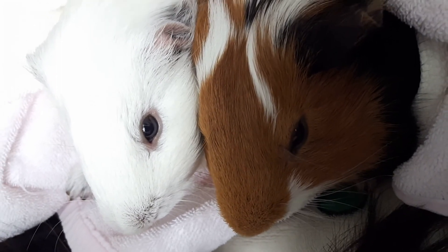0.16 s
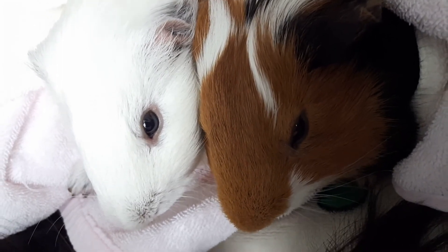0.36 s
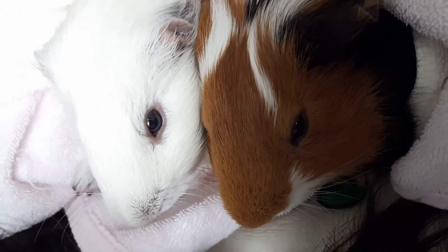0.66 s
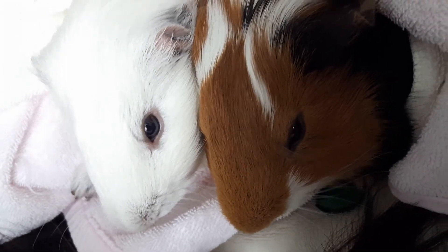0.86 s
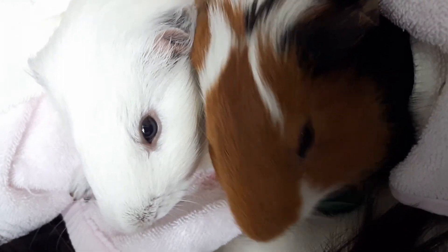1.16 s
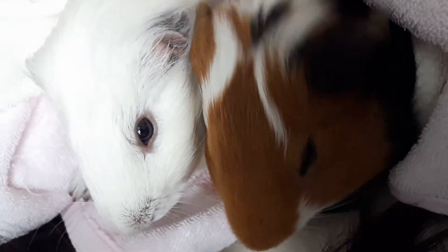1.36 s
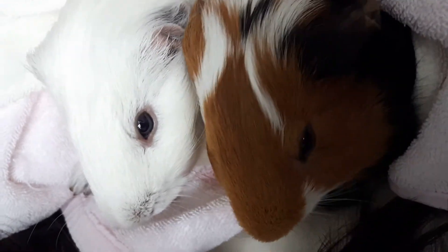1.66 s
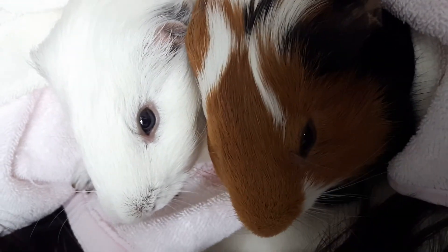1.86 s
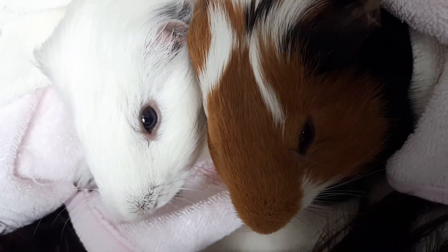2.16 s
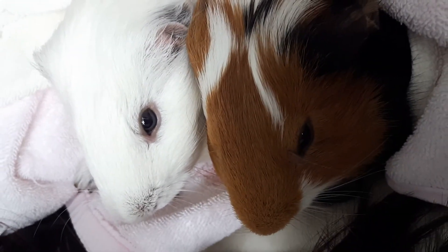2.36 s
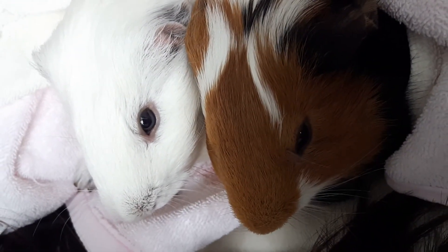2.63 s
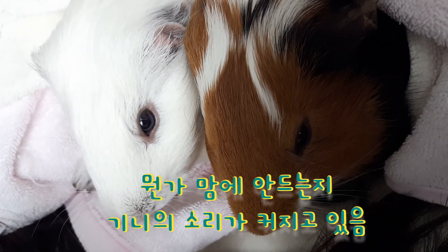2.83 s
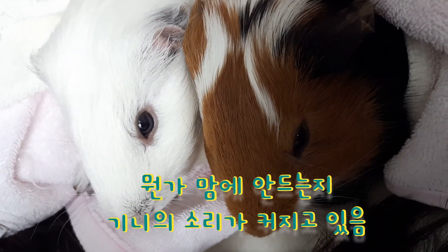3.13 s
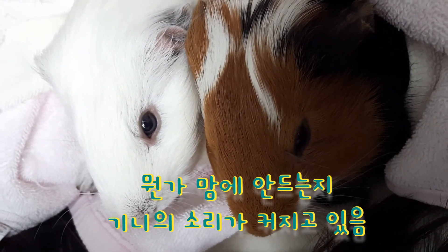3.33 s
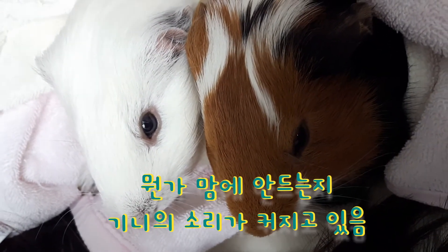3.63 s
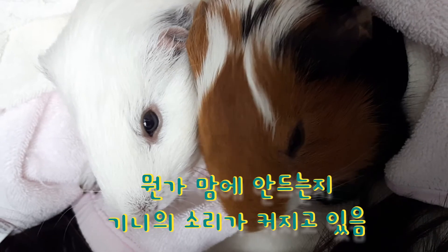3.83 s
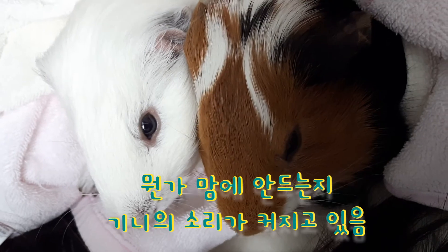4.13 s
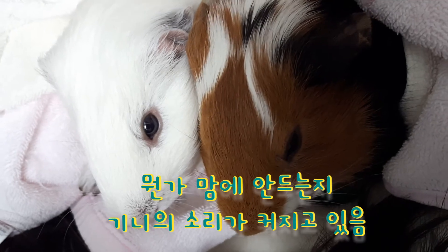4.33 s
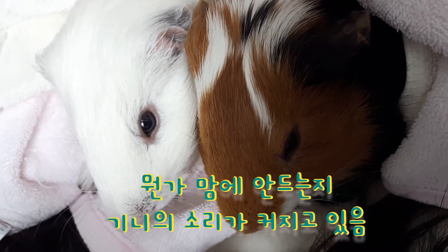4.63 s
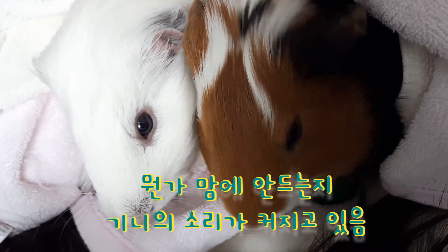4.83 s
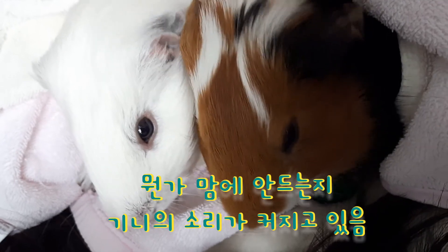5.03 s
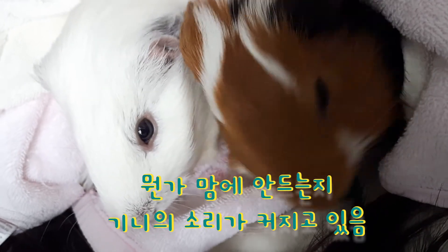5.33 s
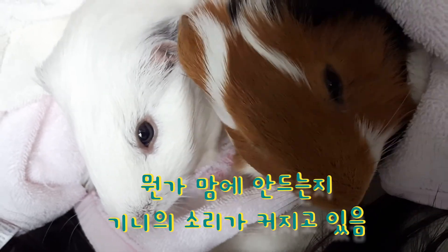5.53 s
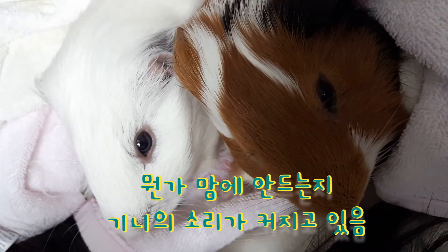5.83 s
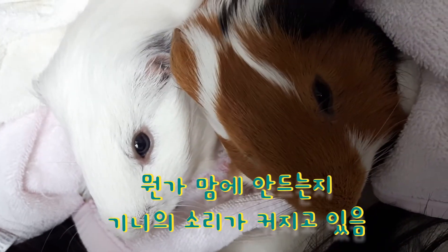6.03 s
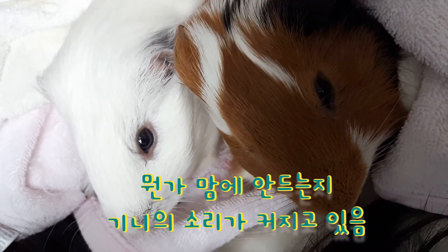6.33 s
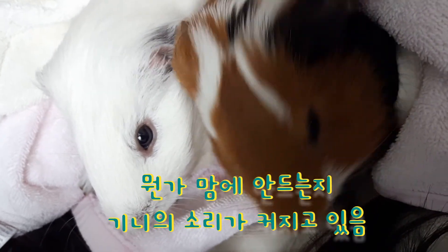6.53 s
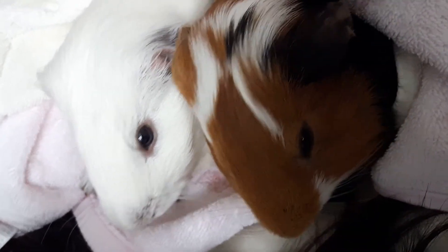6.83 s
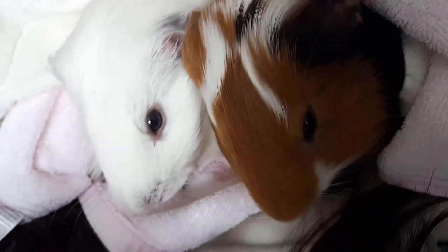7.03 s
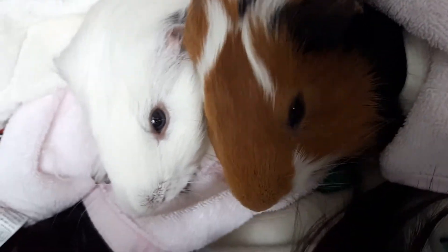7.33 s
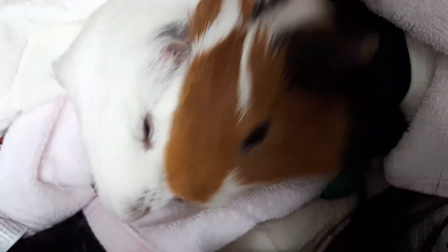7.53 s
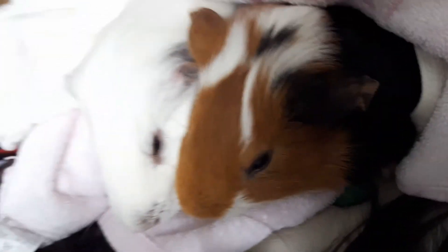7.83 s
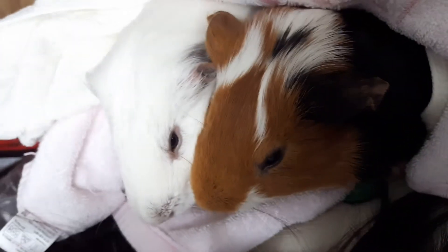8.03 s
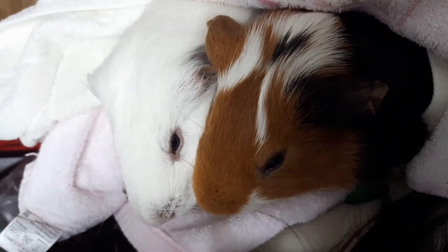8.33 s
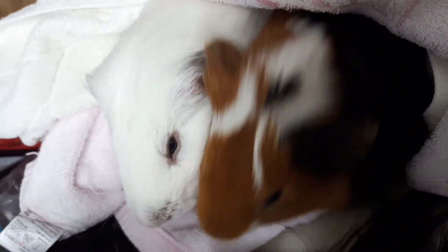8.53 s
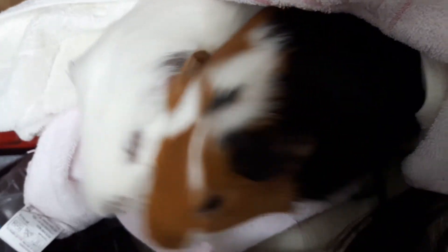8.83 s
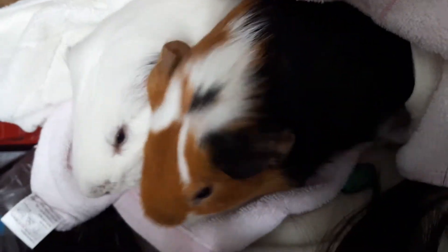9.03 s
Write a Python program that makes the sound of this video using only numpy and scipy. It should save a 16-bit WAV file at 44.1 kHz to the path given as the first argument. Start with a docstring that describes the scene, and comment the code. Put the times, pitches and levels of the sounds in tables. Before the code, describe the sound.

A quiet furnished room with soft low hum, light hiss and a barely perceptible high whistle; a guinea pig is very close in stereo. At 0.25-0.6 s it gives a rough, cracking whine that drops low, then raspy grunts and small peeps at 0.85-1.15. Dry creaky clicks come at 1.4-1.5, a tiny falling peep at 1.7. Smoother wavering moans follow at 2.1-2.4 and 2.7-3.0. From 3.2 to 4.0 short whines fall sharply between rasps and a peep. A brief snort with a soft knock lands at 4.17, then a low whimper and a longer descending whine at 4.55-4.9, another at 5.1-5.4. Faint knocks at 5.7 and 6.2 lead to whines at 6.5-6.75 and a stronger one at 7.0-7.3. After a pause, a short raspy squeak at 8.4; small padded ticks and faint fur rustling at 8.6-9.1 close it.

```python
"""Guinea pig complaining on a blanket

A guinea pig close by gives short gliding whines that break into rasps, creaks and peeps: pulsing vocal
folds make the whines and rasps, a sliding tone each peep, ringing snaps the creaks, all with air noise.
It snorts once in swelling noise; as it moves, small ticks knock and fur rustles near the end.
The quiet room hums and adds a faint tail; two microphones hear the voice with different colours."""
import sys
import numpy as np
from scipy import signal
from scipy.fft import rfft, irfft, next_fast_len
from scipy.io import wavfile
from scipy.ndimage import uniform_filter1d, map_coordinates

SR = 44100
rng = np.random.default_rng(int(sys.argv[2]) if len(sys.argv) > 2 else 0)


def persist_wave(psi):
    """Save psi, clipped to +-1, as 16-bit WAV."""
    counts = np.round(np.clip(psi, -1, 1) * 32767).astype(np.int16)
    wavfile.write(sys.argv[1], SR, np.atleast_2d(counts).T)


N = 404397  # length in samples
TOP_HZ = 15700  # nothing above this is kept
PEEP_ARCH = 0.034  # share by which a peep's pitch bulges in the middle

# Low room noise. Each row: frequency in Hz, relative density in dB per Hz.
ROOM_SPECTRUM = [(20, -3), (36, -5.5), (49, -5.5), (66, -4), (150, -8), (215, -1.5), (350, -8),
                 (430, -14.5), (800, -19), (1500, -26), (3000, -57)]
# How alike the room noise is at left and right. Each row: frequency in Hz, likeness (1 = the same).
ROOM_LIKENESS = [(60, 0.95), (130, 0.76), (290, 0.89), (640, 0.017), (3000, 0.43)]
# Steady hum of an appliance. Each row: frequency in Hz, level in dB before the left-right lean, width in Hz.
HUM_BANDS = [(81.4, -71, 7), (125.1, -71, 12), (285, -61, 26)]
# A faint high whistle. Each row: frequency in Hz, level in dB before the left-right lean, width in Hz.
WHISTLE_BANDS = [(12635, -93.5, 110)]
# Microphone hiss. Each row: frequency in Hz, relative density in dB per Hz.
HISS_SPECTRUM = [(700, -25.5), (1500, 6), (2200, 5.5), (3500, 2), (5500, -1.5), (7300, -4), (8500, -8.5),
                 (10500, -10), (12500, -3.5), (15500, -4.5)]
# What throat and mouth make of the overtones. Each row: frequency in Hz, relative gain in dB.
THROAT_RESPONSE = [(200, -14.5), (450, -5), (620, 1), (730, -4.5), (860, 3.5), (1100, 2), (1350, -7),
                   (1650, -18), (1950, -22.5), (2300, -10), (3200, -32), (4200, -37), (6000, -56)]
# Places where the voice breaks into a rasp. Each row: start in seconds, length in seconds, pitch in Hz,
# fundamental in dB and overtones in dB (both at mid-length), swell from start to end in dB, roughness 0-1.
RASPS = [(0.243, 0.014, 295, -47, -53, -2, 0.4), (0.311, 0.027, 273, -49.5, -51, -5, 0.9),
         (0.336, 0.072, 293, -54, -48, -1, 0.88), (0.854, 0.023, 288, -52.5, -56, 0, 0.37),
         (0.905, 0.033, 302.5, -58, -48, 1, 0.9), (0.94, 0.05, 297, -51.5, -48.5, -6, 0.86),
         (0.978, 0.11, 164.8, -64, -50.5, 0.5, 0.88), (1.076, 0.074, 191.6, -60, -47, 7, 0.58),
         (3.204, 0.024, 277, -42.5, -50, -4, 0.48), (3.224, 0.043, 265, -54, -48, -10, 0.6),
         (3.261, 0.031, 293, -48, -48.5, 10, .7), (3.678, 0.016, 303, -47, -51, 4, 0.6),
         (3.696, 0.036, 282, -51, -49, -3, 0.54), (3.795, 0.057, 233.7, -52, -49.5, 0.5, 0.76),
         (3.847, 0.043, 263, -53, -45.5, 0, 0.78), (3.88, 0.047, 288.4, -45.5, -42.5, 1, 0.33),
         (4.697, 0.027, 257, -52.5, -46.5, 6, 0.4), (4.841, 0.022, 277, -37, -51, 0, 0.41),
         (5.144, 0.036, 356, -57.5, -53, -2, 0.5), (5.249, 0.05, 258, -45.5, -49.5, -3, .33),
         (6.503, 0.026, 272, -50, -54, -2, 0.83), (6.594, 0.019, 334, -51, -50.5, -5, 0.78),
         (7.024, 0.047, 319, -65, -50, 8, 0.65), (7.108, 0.031, 302, -44.5, -43, -3, 0.54),
         (8.374, 0.012, 323, -46.5, -62, 0, .4), (8.396, 0.047, 296, -54, -50.5, -3, 0.72)]
# Gliding whines. Each row: extra brightness in dB, roughness 0-1 (before pitch scales it), and a course
# of points, each with time in seconds, pitch in Hz, level in dB before the whine's common gain.
WHINES = [ (0, 0.34, [(0.245, 307, -45.5), (0.267, 497.3, -50), (0.295, 377, -47), (0.311, 545.0, -43.5),
          (0.325, 472.4, -48)]), (-0.5, 0.22, [(0.392, 759, -44), (0.43, 512, -44), (0.448, 672, -44),
          (0.464, 534, -44), (0.482, 380.5, -41), (0.51, 276, -35.5), (0.56, 255.5, -48.5),
          (0.592, 282, -37.5), (0.608, 266, -44)]), (0, 0.26, [(0.881, 563, -40), (0.889, 553, -46),
          (0.907, 470, -43)]), (-3.5, .1, [(2.11, 304, -47), (2.148, 314.7, -45.5), (2.184, 383.6, -50),
          (2.222, 547, -46), (2.252, 364, -43), (2.278, 309, -40), (2.3, 289.9, -37), (2.344, 348.7, -42),
          (2.37, 334.6, -42.5), (2.406, 284.7, -35.5), (2.43, 292.9, -51.5)]),
          (-3, 0.23, [(2.695, 300, -62), (2.705, 322, -51.5), (2.729, 350, -49), (2.755, 523.6, -48),
          (2.787, 469, -49), (2.817, 324, -43.5), (2.859, 295.3, -39), (2.895, 295, -38),
          (2.921, 334.7, -39.5), (2.971, 367.4, -39.5), (2.99, 304, -43)]), (-2.5, 0.2, [(3.288, 681, -45),
          (3.31, 701, -42), (3.35, 445, -43), (3.364, 424, -42.5), (3.388, 271, -37.5), (3.408, 282, -39)]),
          (-2, .15, [(3.905, 662, -42), (3.919, 643, -36.5), (3.933, 599, -41.5), (3.965, 275, -41.5)]),
          (0, 0.46, [(4.153, 294, -44), (4.189, 355, -49), (4.21, 313.2, -44)]),
          (-2.5, 0.071, [(4.255, 327, -45.5), (4.275, 344.7, -46.5), (4.305, 311.4, -43), (4.335, 333, -44),
          (4.363, 319, -44), (4.379, 280, -61)]), (-4.5, 0.57, [(4.555, 412, -53), (4.575, 513, -53),
          (4.603, 625, -45.5)]), (-1.5, 0.16, [(4.619, 625.6, -48.5), (4.673, 577, -46.5),
          (4.687, 637, -43.5), (4.715, 425.4, -40.5), (4.739, 467.4, -43), (4.763, 404, -41),
          (4.787, 432, -40.5), (4.839, 294.8, -35.5), (4.886, 308, -41)]),
          (-11.5, 0.25, [(5.11, 557, -54.5), (5.128, 665, -55), (5.18, 642, -48), (5.198, 550, -53),
          (5.255, 536, -46.5)]), (-2.5, 0.22, [(5.28, 301.6, -35.5), (5.318, 296, -34.5),
          (5.376, 307.5, -44), (5.398, 287, -46)]), (-4, 0.2, [(6.518, 437.4, -51.5), (6.548, 450.4, -55.5),
          (6.568, 607.5, -48), (6.588, 462.1, -51), (6.614, 599, -48), (6.646, 456, -46),
          (6.676, 300, -38.5), (6.69, 257.1, -36), (6.706, 276, -51), (6.732, 284.5, -37.5),
          (6.755, 294, -53)]), (0, 0.18, [(7.06, 424.6, -40), (7.072, 443.5, -45.5), (7.11, 430.7, -43),
          (7.136, 604, -42.5), (7.15, 531, -41.5), (7.182, 442.3, -40), (7.21, 449, -41), (7.24, 414, -40),
          (7.264, 329.4, -34.5), (7.28, 265, -33), (7.3, 292.9, -42.5)]), (1.5, 0.33, [(8.434, 492, -44),
          (8.454, 409, -45), (8.464, 337.5, -42.5), (8.476, 306, -37), (8.486, 455.0, -45),
          (8.497, 425.9, -44)]), ]
# A whine's overtones are strongest at middle pitches, weaker at low and high ones.
# Each row: pitch in Hz, overtones over fundamental in dB before a whine's extra brightness.
OVERTONE_SHARE = [(280, -15.5), (340, -8.5), (400, -2.5), (450, 3), (540, 2.5), (620, -3.5), (710, -8)]
# The voice flips to a pure high note. Each row: start in seconds, length in seconds, start pitch in Hz,
# end pitch in Hz (both before the arch), level in dB.
PEEPS = [(0.339, 0.018, 820, 790, -45), (1.022, 0.034, 813, 790, -47.5), (1.079, 0.031, 867, 810, -47.5),
         (1.141, 0.025, 987, 843, -47), (1.727, 0.025, 1080, 770, -46), (1.749, 0.02, 786, 470, -49),
         (3.767, 0.033, 856, 870, -43), (7.001, 0.023, 766, 810, -52.5)]
# Short trains of snaps of the vocal folds. Each row: start in seconds, length in seconds, gap between snaps
# in seconds, first level in dB, fade in dB per snap, ring in Hz before scatter, climb in Hz per snap.
CREAKS = [(1.393, .03, 0.011, -35.5, 0, 830, 95), (1.4466, .036, 0.0082, -37.5, 1.7, 1155, -19),
          (1.507, .008, 0.0044, -44.5, 8, 1130, 110), (1.718, .01, 0.0064, -48, 2, 1300, -160),
          (3.745, .003, .007, -38.5, 0, 1070, 0)]
# Air noise of the voice. Each row: frequency in Hz, relative density in dB per Hz.
AIR_SPECTRUM = [(300, -46), (1200, -15.5), (1750, -5), (2300, -0.5), (3200, -4.5), (4200, -19.5),
                (6300, -17), (7400, -11), (8200, -25), (12000, -27)]
# The voice at two microphones. Each row: frequency in Hz, left minus right in dB.
LEFT_RIGHT_BALANCE = [(280, -1), (390, -4), (510, 4), (620, 3), (820, 10), (1230, 2.5), (1450, 0.5),
                      (1750, -3.5), (2080, 2), (2450, -5), (3050, 10), (4000, -3), (6500, -2.5),
                      (7300, 5.5)]
# The voice at two microphones. Each row: frequency in Hz, phase by which left leads in radians.
LEFT_LEAD = [(200, 0.35), (350, 0.083), (450, 1.43), (730, 1.32), (980, 0.78), (1500, 1.6), (1750, 3.94),
             (1950, 5.45), (2500, 9.97)]
# Small knocks as the animal moves. Each row: start in seconds, tick in dB, thud in dB, thud pitch in Hz.
TICKS = [(0.795, -51, -74, 307), (4.153, -47, -42, 250), (4.169, -62, -40.5, 217), (5.711, -58.5, -64, 200),
         (6.212, -86, -41.5, 108), (8.6, -53.5, -60, 200), (8.801, -49, -42, 214),
         (8.9275, -39.5, -43.5, 187), (8.941, -50, -64, 293), (9.13, -61.5, -68, 300)]
# Fur and claws on cloth. Each row: frequency in Hz, relative density in dB per Hz.
CLOTH_SPECTRUM = [(100, -20), (700, 7.5), (1600, -6), (2400, 4.5), (3000, -18.5), (4900, -14.5),
                  (6000, -20), (15000, -47)]
# Puffs of air through the nose. Each row: peak time in seconds, peak level in dB, rise in seconds,
# fall in seconds, each slope over 60 dB.
SNORTS = [(4.169, -45, 0.037, 0.046), (4.19, -56, 0.11, 0.16)]
# Breath noise of the nose. Each row: frequency in Hz, relative density in dB per Hz.
NOSE_SPECTRUM = [(200, -39), (650, 10.5), (1100, -23), (1400, 6.5), (1700, -8), (2000, 5.5), (2450, -1),
                 (2900, -20), (4800, -13.5), (8000, -45.5)]
# Fur sweeping over the blanket. Each row: peak time in seconds, peak level in dB, rise in seconds,
# fall in seconds, each slope over 60 dB.
RUSTLES = [(8.85, -62, .5, 0.24), (8.94, -60.5, 0.14, 0.35)]


def amp(db):
    """Turn decibels into gain."""
    return 10 ** (np.asarray(db) / 20)


def unit(x):
    """Scale x to an average (rms) level of 1."""
    return x / np.sqrt(np.mean(x ** 2) + 1e-20)


def along(points, hz):
    """Read a curve of (Hz, value) points on a log frequency axis."""
    f, v = np.transpose(points)
    return np.interp(np.log(hz + 1), np.log(f), v)


def wobble(rate, size):
    """Draw a smooth random curve with rate random points a second."""
    points = rng.standard_normal(int(size * rate / SR) + 4)
    return map_coordinates(points, [np.arange(size) * rate / SR])


def filtered(x, response):
    """Multiply the spectrum of x by a response, which may also shift phase."""
    m = next_fast_len(x.shape[-1] + 8192)
    spectrum = rfft(x, m) * response(np.fft.rfftfreq(m, 1 / SR))
    return irfft(spectrum, m)[..., :x.shape[-1]]


def noise(spectrum, shape):
    """Make coloured noise with an rms of 1."""
    return unit(filtered(rng.standard_normal(shape), lambda hz: amp(along(spectrum, hz))))


def ring(spectrum, size=1024):
    """Turn a spectrum into a ring that starts at once and then decays, with peak 1."""
    cepstrum = irfft(np.log(amp(along(spectrum, np.fft.rfftfreq(size, 1 / SR)))))
    # folding the second half onto the first keeps the ring from starting early
    cepstrum[1:size // 2] *= 2
    cepstrum[size // 2 + 1:] = 0
    h = irfft(np.exp(rfft(cepstrum)))
    return h / np.abs(h).max()


def loudness(x, size):
    """Follow the rms over size samples."""
    return np.sqrt(np.abs(uniform_filter1d(x ** 2, size)) + 1e-14)


def add(track, s, x):
    """Mix x into the track at time s in seconds."""
    part = track[..., round(s * SR):][..., :x.shape[-1]]
    part += x[..., :part.shape[-1]]


def background(room_db=-60, hiss_db=-70.5, lean_db=1.05):
    """Low room noise, the narrow bands of an appliance's hum, a faint whistle and microphone hiss."""
    def spread(hz):
        """Share the noise between middle and sides so that left and right are as alike as the table says."""
        angle = np.arccos(np.clip(along(ROOM_LIKENESS, hz), -1, 1)) / 2
        return np.array([np.cos(angle), np.sin(angle)])

    mid, side = filtered(noise(ROOM_SPECTRUM, (2, N)), spread)
    room = amp(room_db) * np.array([mid + side, mid - side])
    t = np.arange(N) / SR
    for hz, db, width_hz in HUM_BANDS + WHISTLE_BANDS:
        # slow random drift widens a steady tone into a narrow band
        drift = wobble(width_hz, N) + 1j * wobble(width_hz, N)
        room += amp(db) * unit(np.real(drift * np.exp(2j * np.pi * hz * t)))
    leaning = room * amp([[-lean_db], [lean_db]])  # softer left, louder right
    return leaning + amp(hiss_db) * noise(HISS_SPECTRUM, (2, N))


def folds(t, pitch, low_db, high_db, rough, jitter, fuzz=0.21, fuzz_rate=900, shimmer_db=7,
          chaos_rate=320, scatter_rad=2.17, scatter_rate=150, slope_db=1.0, knee_hz=660, count=17):
    """The folds pulse at the pitch; when rough, cycles differ in length, strength and shape."""
    size = len(t)
    uneven_pitch = pitch * np.exp(jitter * rough * wobble(chaos_rate, size))
    phase = 2 * np.pi * np.cumsum(uneven_pitch) / SR
    strength = amp(shimmer_db * rough * np.tanh(wobble(chaos_rate, size)))
    fundamental = strength * np.cos(phase)

    k = np.arange(2, count)[:, None]  # overtone numbers
    # more effort closes the folds harder and brightens the tone
    bright = amp(slope_db * (high_db + 42) * np.log2(k))
    # a slow creak has little weight below the knee
    creak = np.clip((260 - pitch) / 60, 0, 1)
    weight = bright / (1 + creak * (knee_hz / (k * pitch)) ** 6)
    # in rough stretches the overtones slip out of step, which blurs the pulses into a rasp
    slip = scatter_rad * rough * np.array([wobble(scatter_rate, size) for _ in k])
    # turbulent air leaves a faint fuzz between the overtones
    airy = strength * (1 + fuzz * wobble(fuzz_rate, size))
    source = airy * (weight * np.cos(k * phase + slip)).sum(0)
    overtones = signal.fftconvolve(source, ring(THROAT_RESPONSE))[:size]

    # the fundamental leaves through the nose, the overtones have a level of their own
    low = amp(low_db) * fundamental / loudness(fundamental, size=600)
    high = amp(high_db) * overtones / loudness(overtones, size=600)
    return np.array([low + high, np.broadcast_to(rough, t.shape)])


def gate(t, attack_s, release_s):
    """The voice sets in, holds and lets go."""
    return np.clip(np.minimum((t - t[0]) / attack_s, (t[-1] - t) / release_s), 0, 1)


def rasp(length, pitch, low_db, high_db, swell_db, rough, attack_s=0.0053, release_s=0.0059):
    """A break in the voice: uneven folds at one central pitch; also returns when it holds."""
    t = np.arange(0, length, 1 / SR)
    rise_db = swell_db * (t / length - .5)
    held = gate(t, attack_s, release_s)
    return held * folds(t, pitch, low_db + rise_db, high_db + rise_db, rough, jitter=0.196), held


def whine(bright_db, rough, course, gain_db=0.56, attack_s=0.0038, release_s=0.0081, strain=0.79,
          strain_hz=450, shut_db=7, shut_s=0.019, flutter_db=0.84, flutter_rate=90):
    """A gliding call: overtones are strongest at middle pitches; a higher pitch strains the folds."""
    s, pitch, level_db = np.transpose(course)
    t = np.arange(s[0], s[-1], 1 / SR)
    pitch = uniform_filter1d(np.interp(t, s, pitch), size=400)
    level_db = np.interp(t, s, level_db) + flutter_db * wobble(flutter_rate, len(t))
    share_db = along(OVERTONE_SHARE, pitch) + bright_db
    # fundamental and overtones share the power of the level
    low_db = gain_db + level_db - 10 * np.log10(1 + amp(share_db) ** 2)
    # the mouth shuts just before the voice stops
    high_db = low_db + share_db - shut_db * np.exp((t - t[-1]) / shut_s)
    strained = rough * (pitch / strain_hz) ** strain
    return gate(t, attack_s, release_s) * folds(t, pitch, low_db, high_db, strained, jitter=0.108)


def calls(yield_share=0.48):
    """Sound and roughness of the whines and rasps; a whine gives way while a rasp lasts."""
    whines, rasps, breaking = np.zeros((2, N)), np.zeros((2, N)), np.zeros(N)
    for s, *settings in RASPS:
        sound, held = rasp(*settings)
        add(rasps, s, sound)
        add(breaking, s, held)
    for bright_db, rough, course in WHINES:
        add(whines, course[0][0], whine(bright_db, rough, course))
    return whines * np.clip(1 - yield_share * breaking, 0, 1) + rasps


def peep(length, start_hz, end_hz, octave_db=-27, taper=0.44):
    """A short, nearly pure note that slides in a slight arch, with a weak octave above."""
    u = np.linspace(0, 1, round(length * SR))  # progress from 0 to 1
    slide = start_hz + (end_hz - start_hz) * u
    pitch = slide * (1 + PEEP_ARCH * np.sin(np.pi * u))
    phase = 2 * np.pi * np.cumsum(pitch) / SR
    tone = np.sin(phase) + amp(octave_db) * np.sin(2 * phase)
    return unit(signal.windows.tukey(len(u), taper) * tone)


def knock(tick_db, thud_db, thud_hz, tick_t60_s=0.022, thud_t60_s=0.06, contact_s=0.00033):
    """A burst of cloth noise and a padded thud, each dying away by 60 dB in its own t60."""
    t = np.arange(SR // 8) / SR
    soft = 1 - np.exp(-t / contact_s)  # the padded contact takes a moment to load
    tick = soft * amp(tick_db - 60 * t / tick_t60_s) * noise(CLOTH_SPECTRUM, (2, len(t)))
    thud = amp(thud_db - 60 * t / thud_t60_s) * np.sin(2 * np.pi * thud_hz * t)
    return tick + thud


def snap(hz, t60_s=0.012, upper_db=-16, upper_hz=2450, onset_s=0.00019):
    """One closure of the folds rings the mouth and a weaker resonance at upper_hz."""
    t = np.arange(SR // 25) / SR
    modes = np.sin(2 * np.pi * hz * t) + amp(upper_db) * np.sin(2 * np.pi * upper_hz * t)
    return modes * amp(-60 * t / t60_s) * (1 - np.exp(-t / onset_s))


def creaks(scatter=0.055):
    """Trains of single fold snaps, each ringing at a slightly random pitch."""
    snaps = np.zeros(N)
    for s, length, gap, db, fade_db, hz, climb_hz in CREAKS:
        for k, delay in enumerate(np.arange(0, length, gap)):
            ring_hz = (hz + k * climb_hz) * np.exp(scatter * rng.standard_normal())
            add(snaps, s + delay, amp(db - k * fade_db) * snap(ring_hz))
    return snaps


def microphones(hz):
    """Nearby surfaces give each microphone its own level and phase."""
    sides = np.array([[.5], [-.5]])
    gain = amp(sides * along(LEFT_RIGHT_BALANCE, hz))
    even_power = gain / np.sqrt(np.mean(gain ** 2, 0))
    return even_power * np.exp(1j * sides * along(LEFT_LEAD, hz))


def voice(air_db=-22.5, rough_air_db=8.0, peep_air=0.81, snap_air=1.8):
    """All calls, with air noise that pulses along with them and grows with roughness."""
    whines, rough = calls()
    peeps = np.zeros(N)
    for s, length, start_hz, end_hz, db in PEEPS:
        add(peeps, s, amp(db) * peep(length, start_hz, end_hz))
    snaps = creaks()
    # the part of the voice above about 650 Hz steers the air
    driver = whines + snap_air * snaps + peep_air * peeps
    upper_voice = filtered(driver, lambda hz: 1 / (1 + (650 / (hz + 1)) ** 8))
    airflow = loudness(upper_voice, size=80)
    air = amp(air_db + rough_air_db * np.minimum(rough, .8)) * airflow * noise(AIR_SPECTRUM, (2, N))
    return filtered(whines + snaps + peeps + air, microphones)


def swell(s, db, rise_s, fall_s):
    """A gain that rises to its peak at time s and dies away."""
    t = np.arange(N) / SR - s
    return amp(db - 60 * np.minimum(np.maximum(-t / rise_s, t / fall_s), 2))


def snort():
    """Puffs of air rush through the nose as swelling noise."""
    return sum(swell(*row) for row in SNORTS) * noise(NOSE_SPECTRUM, (2, N))


def rustle():
    """Fur brushes the blanket as swelling cloth noise."""
    return sum(swell(*row) for row in RUSTLES) * noise(CLOTH_SPECTRUM, (2, N))


def movements():
    """The snort, the rustle and the small knocks together."""
    x = snort() + rustle()
    for s, *settings in TICKS:
        add(x, s, knock(*settings))
    return x


def walls(x, t60_s=0.54, wet_db=-23, dull_hz=3000, mode_hz=286, mode_db=-19):
    """The faint answer of a furnished room: a dull tail and one low resonance that rings on."""
    t = np.arange(SR // 2) / SR
    decay = amp(-60 * t / t60_s) * (t > .005)  # the answer starts after 5 ms
    echoes = rng.standard_normal((2, len(t))) * decay
    tail = filtered(echoes, lambda hz: 1 / (1 + 1j * hz / dull_hz)) / np.linalg.norm(decay)
    mode = 2 * np.cos(2 * np.pi * mode_hz * t) * decay / decay.sum()
    return signal.fftconvolve(x, amp(wet_db) * tail + amp(mode_db) * mode, axes=1)[:, :N]


def scene():
    """The animal close by, in its room."""
    animal = voice() + movements()
    return animal + walls(animal) + background()


def record(dry):
    """Keep only what lies below the band limit."""
    return filtered(dry, lambda hz: hz < TOP_HZ)


dry = scene()
out = record(dry)
persist_wave(out)
```